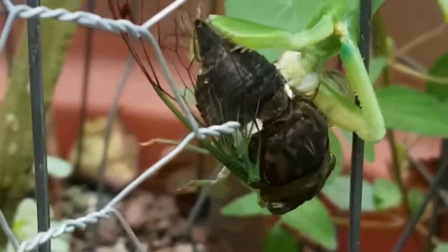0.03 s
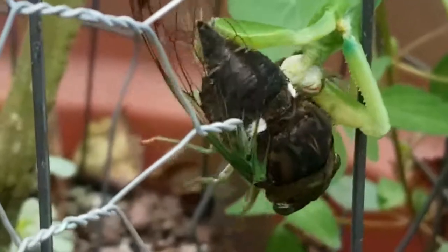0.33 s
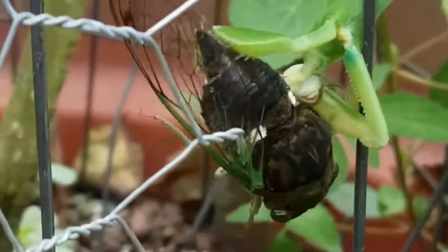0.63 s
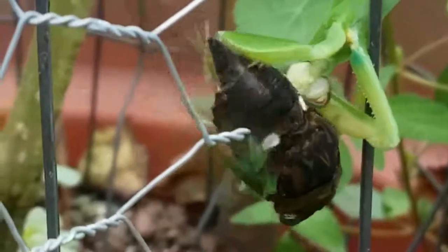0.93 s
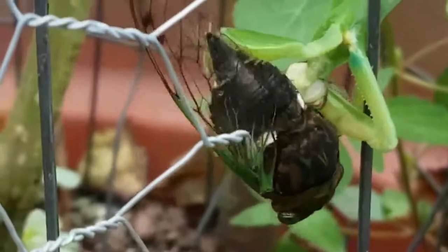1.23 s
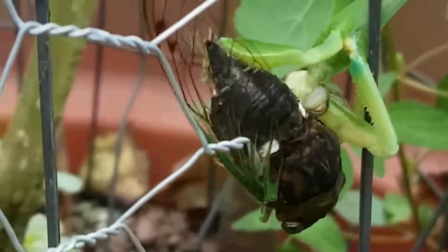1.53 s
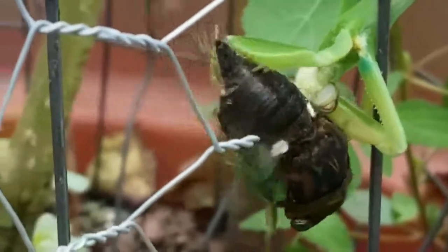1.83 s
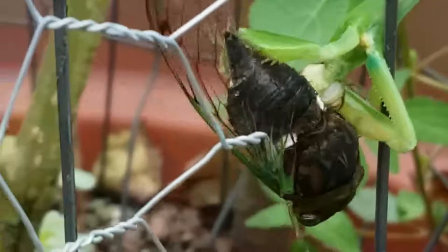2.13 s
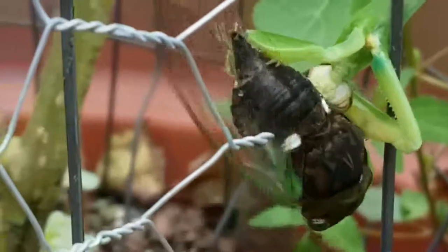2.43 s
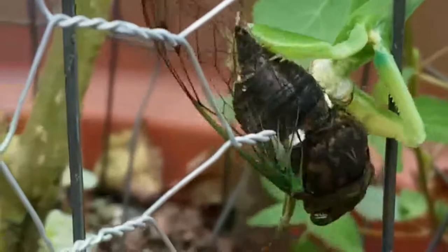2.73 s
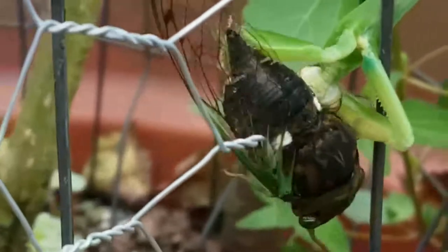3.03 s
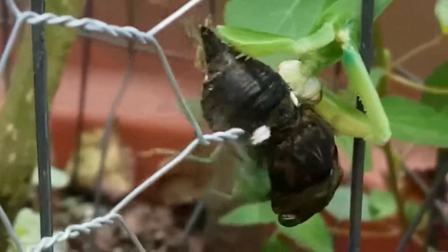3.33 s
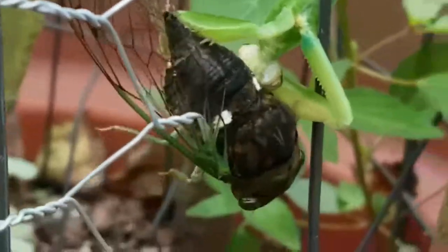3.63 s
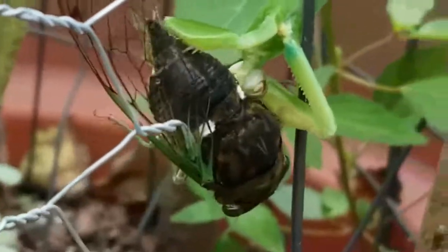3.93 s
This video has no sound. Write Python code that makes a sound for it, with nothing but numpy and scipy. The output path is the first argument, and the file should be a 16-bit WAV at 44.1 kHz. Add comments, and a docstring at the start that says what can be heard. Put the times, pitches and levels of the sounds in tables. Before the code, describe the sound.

Cicada wings flutter in dry, crackling bursts against a wire fence, over a distant insect buzz.

```python
"""Cicada caught at a wire fence

A cicada held by a mantis against a wire garden fence beats its dry wings in short fits. Each slap
is a tiny crackling burst, the wings rustle in between, and the hardest fits set the mesh ringing.
Further off another insect buzzes steadily in paired falling chirps, over a low rumble and hum."""
import sys
import numpy as np
from scipy import signal
from scipy.fft import rfft, irfft, next_fast_len
from scipy.io import wavfile

SR = 44100
rng = np.random.default_rng(int(sys.argv[2]) if len(sys.argv) > 2 else 0)


def log_audio(samples):
    """Write samples as a 16-bit WAV file to the path given in sys.argv[1]."""
    # one column per channel
    frames = np.atleast_2d(samples).T
    # limit to full scale, then quantise
    limited = np.clip(frames, -1, 1)
    pcm = np.round(limited * 32767).astype(np.int16)
    wavfile.write(sys.argv[1], SR, pcm)


N = 176400
TIME = np.arange(N) / SR
BIN_HZ = np.arange(N // 2 + 1) * SR / N


def from_db(db):
    """Decibels to gain."""
    return 10 ** (np.asarray(db) / 20)


def rms_one(x):
    """Scale to unit power."""
    return x / np.sqrt(np.mean(x ** 2) + 1e-20)


def at_hz(points, hz):
    """Read a curve on a log-frequency axis."""
    point_hz, value = np.transpose(points)
    return np.interp(np.log(np.maximum(hz, 1)), np.log(point_hz), value)


def colour(x, curve):
    """Minimum-phase EQ that keeps the power of white noise."""
    size = next_fast_len(N + SR // 2, True)
    gain = rms_one(from_db(at_hz(curve, np.arange(size // 2 + 1) * SR / size)))
    cepstrum = irfft(np.log(gain), size)
    cepstrum[1:size // 2] *= 2
    cepstrum[size // 2 + 1:] = 0
    return irfft(rfft(x, size) * np.exp(rfft(cepstrum)), size)[..., :N]


def drift(rate_hz):
    """Smooth random modulation of unit power."""
    return rms_one(irfft(rfft(rng.standard_normal(N)) / (1 + (BIN_HZ / rate_hz) ** 2), N))


def ring(x, hz, t60):
    """Resonator: a unit click starts a dying sine of height 1."""
    radius, step = from_db(-60 / (t60 * SR)), 2 * np.pi * hz / SR
    return signal.lfilter([0, np.sin(step)], [1, -2 * radius * np.cos(step), radius ** 2], x + 1e-18)


def add(track, start_s, sound):
    """Mix a sound in at a time."""
    i = int(np.clip(start_s * SR, 0, N))
    track[i:i + len(sound)] += sound[:N - i]


def pan(right_db):
    """Stereo gains that favour the right side by this much."""
    return from_db([[-right_db / 2], [right_db / 2]])


def scatter(x, t60):
    """Dense dying reflections from leaves, pots and walls, different on each side."""
    t = TIME[:SR // 2]
    echoes = rng.standard_normal((2, len(t))) * from_db(-60 * t / t60) * (t > .002)
    echoes /= np.sqrt(np.sum(echoes ** 2, axis=1, keepdims=True))
    return signal.fftconvolve(np.atleast_2d(x), echoes, axes=1)[:, :N]


# Fader ride shared by rumble and hum: (time [s], relative level [dB])
LOW_SWELL = [(0, -2.5), (1.3, -3.5), (2.3, 4), (2.7, -2), (4, -1.5)]


def swell(waver_db, rate_hz):
    """Gain of the low end: one slow swell with a random waver on top."""
    return from_db(np.interp(TIME, *np.transpose(LOW_SWELL)) + waver_db * drift(rate_hz))


# Tone of the outdoor bed: (frequency [Hz], relative level [dB])
AIR_EQ = [(25, -23), (45, -0.5), (65, 2), (120, -0.5), (200, -9.5), (400, -21), (1000, -21), (2200, -29),
          (3700, -24), (5500, -27), (9500, -28), (11000, -31.5), (14500, -56)]
# Stereo image of the bed: (frequency [Hz], left-right correlation [0..1])
AIR_CORRELATION = [(60, 0.98), (120, 0.94), (380, 0.76), (700, 0), (1300, 0.0057), (8000, 0.0)]


def garden_air():
    """Distant rumble, alike on both sides, opening into wide hiss higher up."""
    alike = at_hz(AIR_CORRELATION, BIN_HZ)
    mid, side = rfft(rng.standard_normal((2, N)))
    noise = irfft(np.sqrt(1 + alike) * mid + np.sqrt(1 - alike) * side * [[1], [-1]], N)
    air = colour(noise, AIR_EQ)
    rumble = signal.sosfilt(signal.butter(1, 200, fs=SR, output="sos"), air)
    hiss = air - rumble
    return from_db(-49.5) * rms_one(hiss + rumble * swell(waver_db=2.5, rate_hz=1.5))


def low_hum():
    """A low tone that wavers in pitch and level and swells with the rumble."""
    hz = 112.6 + 2.57 * drift(rate_hz=6.4)
    tone = np.sin(2 * np.pi * np.cumsum(hz) / SR)
    return from_db(-57) * rms_one(tone * swell(waver_db=3.5, rate_hz=8.4))


# Band of the blurred insect song: (frequency [Hz], relative level [dB])
WASH_EQ = [(6000, -33.5), (6600, -16.5), (7050, -12), (7500, 1.5), (7800, 3), (8150, -0.5), (8500, -7),
           (9000, -21.5), (10300, -33.5)]


def insect_wash():
    """The far insect's song, blurred by leaves and distance into a steady band of noise."""
    return from_db(-44.3) * colour(rng.standard_normal((2, N)), WASH_EQ)


def insect_buzz():
    """The far insect sings two falling chirps per cycle, trailed by short reflections."""
    cycle_hz, first_s, second_at_cycles, second_db = 28.7, .029, .39, -.6
    chirp_s, top_hz, end_hz = .00756, 8248, 7090
    jitter_s, jitter_db, jitter_hz, right_lag_s = .00042, .86, 92, .000036
    song, t = np.zeros(N), np.arange(0, chirp_s, 1 / SR)
    for k, (late, loud, sharp, phase) in enumerate(rng.standard_normal((250, 4))):
        cycle, is_second = divmod(k, 2)
        start = first_s + (cycle + is_second * second_at_cycles) / cycle_hz + jitter_s * late
        hz = top_hz + (end_hz - top_hz) * t / chirp_s + jitter_hz * sharp
        chirp = np.sin(np.pi * t / chirp_s) * np.sin(2 * np.pi * (np.cumsum(hz) / SR + phase))
        add(song, start, from_db(jitter_db * loud + is_second * second_db) * chirp)
    song = rms_one(song)
    right = irfft(rfft(song) * np.exp(-2j * np.pi * right_lag_s * BIN_HZ), N)
    return from_db(-47.3) * np.array([song, right]) + from_db(-48) * rms_one(scatter(song, t60=.035))


# The body shakes the fence: (time [s], relative level [dB], tilt about 600 Hz [dB/octave])
MESH_SHAKES = [(0.275, -59, 4), (1.865, -54.5, 5), (2.282, -43, 1), (2.506, -42.5, -2), (3.015, -58, 5),
               (3.416, -40.5, 2)]
# Ringing modes of the mesh: (frequency [Hz], relative level [dB], time to fall 60 dB [s])
MESH_MODES = [(308.6, -8, 0.5), (375, -7, 0.37), (558, -6.5, 0.59), (606, -4, 0.54), (702, -4.5, 0.57),
              (800, -13, 0.88), (933, -15, 1), (1378, -11, 0.38), (1480, -13, .4), (1730, -10.5, 0.41)]


def wire_mesh():
    """Each shake swells and rings out: a clear tone per mode, blurred by the neighbouring wires."""
    rise_s, width, tone_db, blur_db = .0089, .45, -11, -9.5
    out = np.zeros((2, N))
    for hz, mode_db, t60 in MESH_MODES:
        envelope = np.zeros(N)
        for start, db, tilt in MESH_SHAKES:
            attack = np.clip((TIME - start) / rise_s, 0, 1)
            decay_db = -60 * np.clip(TIME - start - rise_s, 0, 2) / t60
            envelope += attack * from_db(db + mode_db + tilt * np.log2(hz / 600) + decay_db)
        tone = rms_one(np.sin(2 * np.pi * (hz * TIME + rng.random())))
        mid, side = rms_one(ring(rng.standard_normal((2, N)), hz, t60=.017))
        blur = mid + width * side * [[1], [-1]]
        out += envelope * (from_db(tone_db) * tone + from_db(blur_db) * blur)
    return out


def left_first(x, lag_s=.00007):
    """Stereo pair: the wings reach the right side a little late."""
    return np.array([x, np.interp(TIME - lag_s, TIME, x)])


def grains(grain_db):
    """Gritty noise: every sample gets its own random boost."""
    return rms_one(rng.standard_normal(N) * from_db(grain_db * np.minimum(rng.exponential(1, N), 4)))


# Crisp top and papery middle of the wing crackle: (frequency [Hz], relative level [dB])
TREBLE_EQ = [(5000, -23), (6500, -9.5), (8000, 6), (9000, -6.5), (10300, 0), (12200, 2.5), (14400, 1.5),
             (14900, -27)]
MIDDLE_EQ = [(150, -7.5), (600, -7), (1200, -6.5), (1750, -5.5), (2200, -7.5), (2800, -1), (3500, -0.5),
             (4500, -0.5), (5500, 1.5), (7000, 0), (10000, -5)]


def crackle(treble, middle, grain_db):
    """Dense tiny buckles of a dry membrane, in two bands that each follow their own envelope."""
    treble_width, middle_width = .67, .29  # share of power that differs between the sides
    out = np.zeros((2, N))
    for envelope, width, eq in (treble, treble_width, TREBLE_EQ), (middle, middle_width, MIDDLE_EQ):
        common, left, right = [grains(grain_db) for _ in range(3)]
        direct = np.array([rms_one(side) for side in left_first(common)])
        grit = np.sqrt(1 - width) * direct + np.sqrt(width) * np.array([left, right])
        out += colour(envelope * grit, eq)
    return out


# Resonances of the stiff wing: (frequency [Hz], bandwidth [Hz], send level [dB])
MEMBRANE_MODES = [(1830, 130, -6), (3070, 270, -11), (3480, 210, -4), (4600, 250, -6.5)]


def membrane(x):
    """The wing adds its own short papery resonances."""
    return x + sum(from_db(db) * signal.lfilter(*signal.iirpeak(hz, hz / width_hz, fs=SR), x)
                   for hz, width_hz, db in MEMBRANE_MODES)


# Fits of fluttering: (start [s], end [s], relative level [dB])
FLUTTER_FITS = [(0.104, 0.12, -44), (0.226, 0.317, -42.5), (0.576, 0.61, -49.5), (0.834, 0.863, -42),
                (0.932, 0.985, -42.5), (1.238, 1.263, -49.5), (1.348, 1.368, -45), (1.643, 1.703, -42),
                (1.835, 1.887, -38.5), (2.13, 2.165, -46), (2.236, 2.295, -41.5), (2.489, 2.52, -42.5),
                (2.881, 2.924, -44.5), (2.991, 3.052, -40.5), (3.22, 3.298, -45), (3.38, 3.439, -39),
                (3.74, 3.758, -41.5)]


def wing_rustle():
    """The wings rub on wire and body: a flickering, papery rustle through each fit."""
    attack_s, release_s, flicker_db = .004, .011, 4
    effort = np.zeros(N)
    for start, end, db in FLUTTER_FITS:
        attack = np.clip((TIME - start) / attack_s, 0, 1)
        release = np.exp(-np.clip(TIME - end, 0, 1) / release_s)
        effort += from_db(db) * attack * release
    effort *= from_db(flicker_db * drift(rate_hz=87))
    return crackle(from_db(-6) * effort, from_db(-4) * effort, grain_db=6)


# Wing hits: (time [s], relative level [dB], middle-band offset [dB], decay [s], ping pitch [Hz])
WING_HITS = [(0.122, -24.5, -12, 0.0034, 3360), (0.24, -17.5, -12.5, 0.0039, 3650),
             (0.2737, -26, -6.5, 0.0039, 3230), (0.2798, -28, -7, 0.0017, 2950),
             (0.3078, -30.5, -15, 0.0038, 3280), (0.5881, -25.5, -14, 0.0041, 2560),
             (0.8505, -22.5, -11, 0.0022, 3350), (0.9425, -18, -15, 0.0024, 2770),
             (0.9567, -33.5, -4, 0.0035, 3470), (0.979, -30, -9, 0.0016, 4370),
             (1.2515, -29, -15.5, 0.0033, 3470), (1.3686, -29, -6.5, 0.0022, 3350),
             (1.658, -25, -9, 0.005, 3380), (1.6897, -29.5, -5.5, 0.0043, 3100),
             (1.849, -22, -8.5, 0.0024, 3220), (1.8632, -26, -10.5, 0.0031, 2830),
             (1.88, -30.5, -4.5, 0.0027, 4820), (2.152, -28, -15, 0.0017, 3500),
             (2.2517, -20, -7.5, 0.0016, 3400), (2.2688, -31, -10, 0.0021, 4030),
             (2.2802, -23, -8, 0.0022, 3630), (2.294, -26, -8, 0.0025, 3700), (2.327, -28, 0, 0.0011, 4100),
             (2.5059, -20.5, -10.5, 0.002, 4160), (2.5368, -24.5, -1.5, 0.0014, 2730),
             (2.6207, -36, -6, 0.0032, 3100), (2.6516, -39.5, -6, 0.0021, 3360),
             (2.9043, -26.5, -28, 0.0024, 3450), (3.0066, -24.5, -9.5, 0.0024, 3600),
             (3.0197, -30, -4, 0.0021, 3550), (3.039, -34.5, -6, 0.0055, 3550),
             (3.237, -22, -11.5, 0.0042, 3480), (3.2507, -25, -6, 0.0029, 3060),
             (3.271, -29.5, -8, 0.0016, 3550), (3.3967, -16, -13.5, 0.0018, 3660),
             (3.413, -21, -10, 0.0014, 2840), (3.4291, -25, -5, 0.003, 3190),
             (3.46, -38, -16, 0.0019, 3370), (3.7569, -28.5, -7.5, 0.0022, 2930)]


def wing_slaps():
    """Each slap buckles the membrane with a snap, a hollow ping and a crackle, and pushes a puff of air."""
    rise_s, snap_s, snap_db = .00081, .0011, -5
    treble_trim_db, middle_trim_db, puff_db = -5.5, -.5, -23
    ping_s, partner_ratio, partner_db = .0015, 1.176, -16
    hard_slap_db, hard_ping_db, ping_db_per_db = -30, -33.5, .96
    t = TIME[:SR // 20]
    attack, since_peak = np.minimum(t / rise_s, 1) ** 2, np.maximum(t - rise_s, 0)
    snap = from_db(snap_db) * np.exp(-since_peak / snap_s)  # the first buckle stands out
    treble, middle, ping, push = np.zeros((4, N))
    for start, db, middle_db, decay_s, hz in WING_HITS:
        envelope = attack * (snap + np.exp(-since_peak / decay_s))
        add(treble, start, from_db(db + treble_trim_db) * envelope)
        add(middle, start, from_db(db + middle_db + middle_trim_db) * envelope)
        add(push, start, from_db(db + puff_db) * envelope / envelope.sum())
        phase = 2 * np.pi * hz * t
        modes = np.sin(phase) + from_db(partner_db) * np.sin(partner_ratio * phase)
        ping_db = hard_ping_db + ping_db_per_db * (db + middle_db - hard_slap_db)
        add(ping, start, from_db(ping_db) * attack * np.exp(-since_peak / ping_s) * modes)
    puff = ring(push, hz=112, t60=.046)
    return crackle(treble, middle, grain_db=3.5) + left_first(ping) + puff


def scene():
    """Close wings with their reflections and the ringing wire, in front of the buzz and the garden."""
    wings = membrane(wing_slaps() + wing_rustle()) * pan(right_db=.5)
    near_echo = from_db(-9.5) * scatter(wings, t60=.11)
    yard_echo = from_db(-19.5) * scatter(wings, t60=.25)
    far_insect = (insect_buzz() + insect_wash()) * pan(right_db=1.6)
    return wings + near_echo + yard_echo + far_insect + wire_mesh() + garden_air() + low_hum()


def record(dry):
    """A steep high cut, 70 dB down from 16.1 kHz up."""
    return signal.sosfilt(signal.cheby2(14, 70, 16100, fs=SR, output="sos"), dry)


dry = scene()
out = record(dry)
log_audio(out)
```